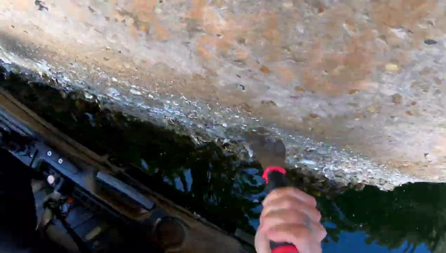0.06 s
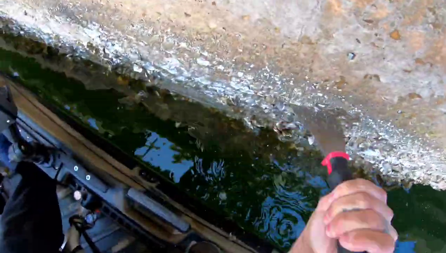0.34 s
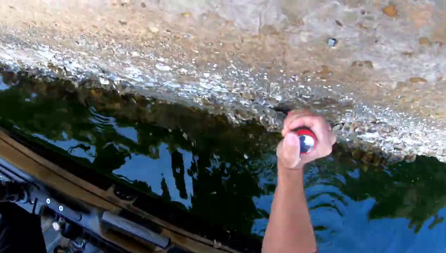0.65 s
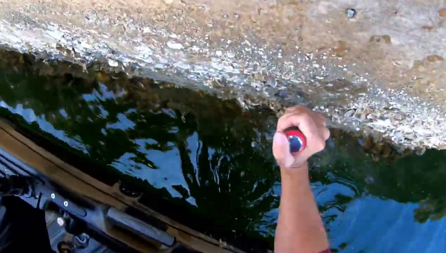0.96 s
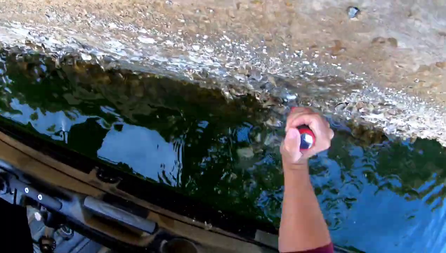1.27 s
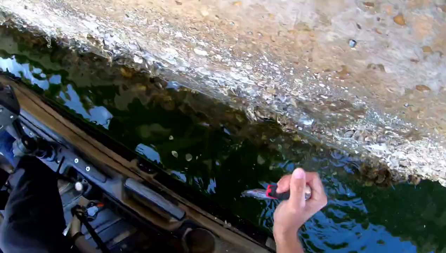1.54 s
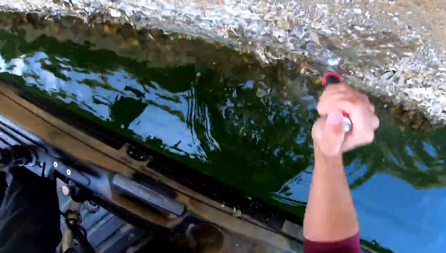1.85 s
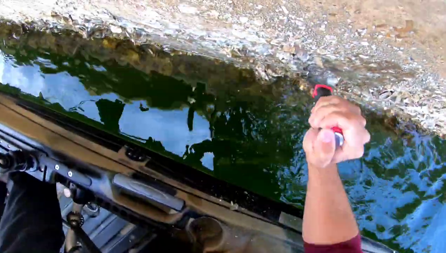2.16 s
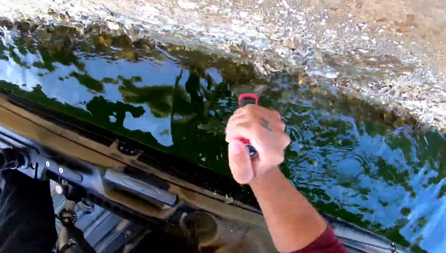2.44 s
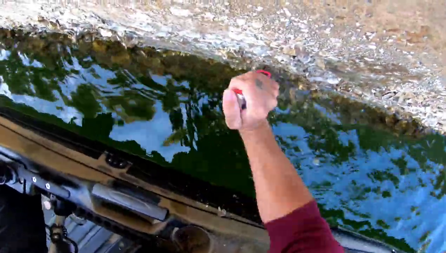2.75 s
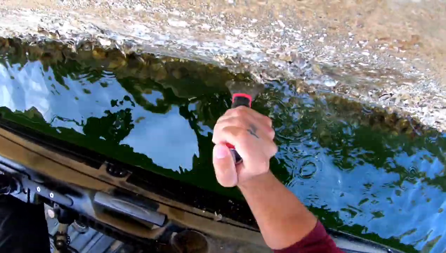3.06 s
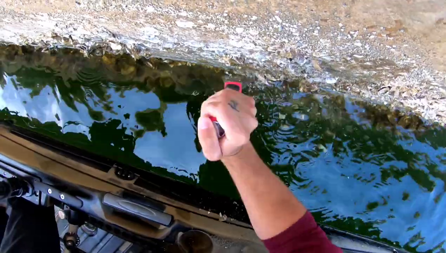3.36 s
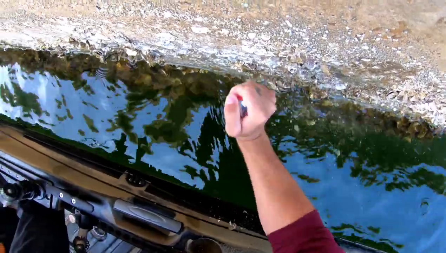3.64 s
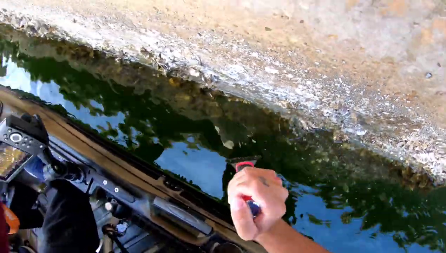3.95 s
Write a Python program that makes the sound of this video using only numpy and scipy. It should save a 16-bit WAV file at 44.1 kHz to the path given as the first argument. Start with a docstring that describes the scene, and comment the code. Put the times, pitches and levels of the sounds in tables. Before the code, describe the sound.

Short gritty scrapes of a steel blade on a shell-crusted wall, boat engines idling behind.

```python
"""Scraping shells off a harbour wall

From a boat idling beside a concrete wall, a stereo microphone close to a jabbing steel scraper.
The blade rasps lightly, bites into the crust with gritty screeches, cracks shells and rings;
bits plop into the water. Behind it two engines throb over the rumble of hull and wind,
and their wash swells as one of them speeds up."""
import sys
import numpy as np
from scipy import signal
from scipy.fft import rfft, irfft, next_fast_len
from scipy.io import wavfile
from scipy.ndimage import uniform_filter1d

SR = 44100
rng = np.random.default_rng(int(sys.argv[2]) if len(sys.argv) > 2 else 0)


def wrap_up_sound(samples):
    """Save the sound to the file named by the first command line argument, as 16-bit audio."""
    columns = np.atleast_2d(samples).T
    # keep every value between -1 and 1, then stretch to whole-number steps
    tamed = np.clip(columns, -1, 1)
    steps = np.round(tamed * 32767).astype(np.int16)
    wavfile.write(sys.argv[1], SR, steps)


N = 176400

# Levels are relative; scene() sets the balance.
# hull and wind around the microphone: frequency_hz, level_db
RUMBLE_SPECTRUM = [(15, -2), (28, -20), (38, 5), (60, 1), (85, -2.5), (125, -1), (160, -11.5), (230, -15.5),
                   (400, -28), (1000, -78)]
# rise and fall of that rumble: time_s, level_db
RUMBLE_LEVEL = [(0, -27), (.8, -27.5), (1.3, -23), (1.8, -21), (2.3, -26.5), (3.2, -25), (4, -26.5)]
# churned water around the boat: frequency_hz, level_db
WASH_SPECTRUM = [(60, -1), (200, -0.5), (320, 4.5), (480, 0), (700, 0), (1000, 1), (1400, -5.5),
                 (2000, -15), (3000, -26.5), (5000, -34.5), (7500, -37), (10000, -45), (13000, -63),
                 (16000, -64)]
# swell of that wash: time_s, level_db
WASH_LEVEL = [(0, -42.5), (.3, -43), (.68, -47), (1.1, -45), (1.4, -41.5), (1.8, -38), (2.3, -40),
              (3.0, -39), (3.4, -43), (3.7, -39.5), (4, -40.5)]
# how alike left and right are in rumble and wash: frequency_hz, correlation
STEREO_LIKENESS = [(30, 0.92), (250, .98), (400, 0.98), (600, 0.39), (1000, 0.13), (1600, 0.22),
                   (3000, 0.28), (8000, 0.27)]
# the engine that keeps idling: time_s, firing_hz, level_db
IDLING_ENGINE = [(0, 40.64, -23.5), (.3, 40.56, -25), (.55, 41.1, -24.5), (.75, 39.3, -30.5),
                 (1.05, 40.56, -22.5), (1.4, 39.47, -36.5), (1.8, 40.93, -19.5), (2.1, 39.55, -22),
                 (2.6, 39.51, -20), (3.3, 39.23, -29.5), (4, 39.59, -17.5)]
# the engine that speeds up: time_s, firing_hz, level_db
REVVING_ENGINE = [(0, 42, -40), (.8, 42, -30.5), (1.2, 45, -34), (1.42, 47.5, -21), (1.6, 44.5, -24.5),
                  (1.8, 45.3, -21), (2.15, 43.9, -20), (2.8, 44.6, -19), (3.4, 44.2, -18), (4, 44, -21)]
# harmonics 1 to 8 of each firing rate: level_db
IDLING_HARMONICS = [-8.5, 2.5, -7, -11.5, -27.5, -40.5, -32.5, -25.5]
REVVING_HARMONICS = [-17.5, -3, -3, -19, -34, -35, -27, -36]
# shell chips ringing as they break off: start_s, level_db, pitch_hz, decay_s
PLINKS = [(1.502, -38.5, 3530, .002), (2.606, -41, 6400, 0.0018), (2.949, -14.5, 2509, .003),
          (3.136, -35, 5000, 0.00092), (3.362, -21, 2770, 0.00069), (3.41, -43, 5100, 0.011)]
# knocks through the wall and bits landing in the water: start_s, level_db, pitch_hz, decay_s
THUDS = [(.19, -27, 1336, 0.003), (.322, -26.5, 564, 0.01), (0.33, -24.5, 300, 0.012),
         (0.755, -26.5, 1010, 0.0046), (0.781, -18, 277, 0.0078), (.782, -25.5, 515, 0.0025),
         (.903, -24, 448, 0.01), (1.177, -17, 278, 0.0063), (1.18, -29, 545, 0.0027),
         (1.582, -23, 272, 0.012), (1.897, -29, 930, 0.0025), (2.34, -26, 330.6, 0.0089),
         (2.87, -30.5, 887, 0.0088), (2.88, -23.5, 236, 0.0062), (3.316, -30, 1192, 0.0028),
         (3.704, -32, 709, 0.004)]
# light dragging between bites: start_s, length_s, level_db, sag_db
DRAGS = [(0.043, 0.059, -48, 10), (0.118, 0.042, -49.5, -6), (0.174, 0.044, -39, -3.5),
         (0.218, 0.33, -47.5, -6), (0.484, 0.068, -52, 2.5), (0.543, 0.22, -42.5, -10),
         (0.702, 0.017, -36.5, -1.5), (0.817, 0.11, -58.5, 5), (0.926, 0.084, -43.5, -14),
         (1.012, 0.073, -44, -2.5), (1.068, 0.036, -32.5, -8), (1.116, 0.038, -62, 17),
         (1.326, 0.037, -35.5, -12), (1.415, 0.055, -46, -4), (1.538, 0.023, -50, 13),
         (1.688, 0.033, -60, -4), (1.812, 0.025, -38, -10), (1.992, 0.032, -52, 9), (2.027, .19, -45, -9.5),
         (2.397, 0.068, -57, 8), (2.463, 0.071, -50, -20.5), (2.899, .04, -51, -2),
         (2.94, 0.038, -41.5, -1.5), (2.986, 0.2, -48, -18), (3.368, 0.067, -50, 1.5),
         (3.426, 0.13, -48.5, -17), (3.762, 0.086, -48, -15), (3.833, 0.17, -59, -4)]
# steel sliding on grit: frequency_hz, level_db
DRAG_SPECTRUM = [(300, 3), (1200, -6.5), (2200, 3.5), (4200, 1), (6000, -7.5), (7700, -4), (8700, -10.5),
                 (10000, -11.5), (11500, -26), (15000, -31)]
# extra resonances of the lightly held blade: pitch_hz, width_hz, lift_db
DRAG_MODES = [(2010, 91, 5), (4340, 39, 8.5), (7300, 100, 8)]
# the blade skipping free: start_s, length_s, low_mode_db, middle_mode_db, high_mode_db
RINGS = [(0.133, 0.033, -37, -59, -85), (0.483, 0.035, -42, -55, -85), (0.756, 0.022, -24, -21, -51),
         (1.148, 0.027, -21, -18, -29), (1.211, .016, -34, -14.5, -51), (1.225, 0.0093, -22, -38, -50),
         (2.867, 0.0079, -29, -28, -31.5), (2.883, 0.036, -30.5, -49, -91),
         (3.266, 0.059, -29.5, -28.5, -39), (3.6662, .021, -24, -26.5, -41.5),
         (3.689, 0.011, -22, -40, -51), (3.763, 0.089, -51, -60, -75)]
# low, middle and high mode of the free blade: pitch_hz
FREE_MODES = [4365, 7335, 9580]
# shells snapping under the edge: start_s, level_db, pitch_hz, lift_db
CRACKS = [(.099, -26, 4430, 9), (.190, -23, 3700, 10.5), (0.3083, -25, 5560, 4), (.722, -31, 2500, 12),
          (.756, -17, 2100, 16.5), (.782, -6.5, 3300, 13.5), (.902, -29, 6600, -4), (.932, -32, 6900, -4),
          (.965, -31.5, 8200, 26), (1.069, -31, 3000, 14), (1.098, -27.5, 3974, 7),
          (1.1795, -12.5, 2300, 8.5), (1.2067, -15, 2100, 8), (1.354, -21.5, 6620, 11),
          (1.557, -16, 5400, -26), (1.563, -16, 2000, 6), (1.585, -11.5, 4000, 10), (1.608, -17, 3900, 9),
          (1.626, -17, 1980, 7), (1.630, -18, 2300, 4), (1.816, -22.5, 5000, 2.5), (1.842, -36, 6000, 9),
          (1.8965, -8, 3200, 7), (1.900, -15.5, 2700, 21), (2.077, -29, 8000, 4), (2.313, -24.5, 4502, 1),
          (2.3435, -12.5, 2340, 4), (2.948, -30, 3800, 6), (3.197, -33.5, 5500, 3),
          (3.2715, -12.5, 3500, 6), (3.2865, -13, 5400, 15), (3.316, -8.5, 3300, 16),
          (3.362, -32.5, 2800, 14), (3.397, -39, 8000, 11), (3.6666, -20, 2300, 12.5),
          (3.704, -10, 3726, 8), (3.938, -37, 4500, -1)]
# bites into the crust: start_s, length_s, level_db, sag_db, first_mode_hz, second_mode_hz, treble_db
BITES = [(0.749, 0.0053, -27, 1, 1880, 3300, -3.5), (0.7544, 0.028, -16.5, -1.5, 2010, 3380, 0),
         (1.148, 0.035, -19.5, -3.5, 2070, 3707, 2), (1.2078, 0.005, -13, -2.5, 2140, 3640, -8.5),
         (1.214, 0.02, -29.5, 0.5, 2450, 4000, 0.5), (1.556, 0.0067, -8.5, -5, 2020, 3600, 2),
         (1.567, 0.019, -22.5, -2.5, 2320, 3680, -16), (1.606, 0.022, -14, -2, 2015, 3720, -3.5),
         (2.3238, 0.0092, -16, -3, 2320, 3410, -6), (2.338, 0.0094, -21, 0.5, 2370, 4370, -3),
         (2.8615, 0.023, -15.5, -2, 2820, 3330, -0.5), (3.2677, 0.017, -13, -22, 2400, 3450, -3.5),
         (3.284, .025, -13.5, -21, 2314, 3630, 0), (3.689, 0.0099, -25, -11.5, 4270, 6950, 7),
         (3.7002, 0.0058, -17, -3, 1972, 2060, -5.5)]
# steel edge on shell: frequency_hz, level_db
SHELL_SPECTRUM = [(150, -17.5), (400, -15), (800, -20.5), (1450, -11.5), (1900, 0), (2700, -1.5),
                  (4200, -2.5), (5800, -4), (7600, 0), (8500, -11.5), (9700, -9.5), (10700, -20.5),
                  (12300, -21), (13200, -25), (15500, -34.5)]
# resonances of the blade against the wall: pitch_hz, width_hz, lift_db
PRESSED_MODES = [(4430, 45, 7.5), (5220, 120, 5), (5480, 83, 7), (6040, 190, 6), (6760, 180, 6),
                 (7370, 270, 8), (7900, 80, 7.5), (9580, 220, 4), (11600, 230, 7), (12350, 200, 1)]
# phase between the microphone's two sides: frequency_hz, left_lead_rad
LEFT_LEAD = [(200, 0), (2000, .25), (4400, .6), (7000, 1), (8100, 1.35), (12000, 1.3)]
# balance between those sides: frequency_hz, left_minus_right_db
LEFT_BALANCE = [(500, -1), (2200, -0.5), (4000, -1.5), (6000, 0.5), (8000, 0), (12000, 2)]

BLADE_ATTACK_S, SNAP_RISE_S = .0011, .00028


def amp(db):
    return 10 ** (np.asarray(db) / 20)


def unit(x):
    return x / np.sqrt(np.mean(x ** 2) + 1e-20)


def at_hz(points, hz):
    knots_hz, value = np.transpose(points)
    return np.interp(np.log(hz + 1), np.log(knots_hz + 1), value)


def over_time(points, column=1):
    points = np.array(points)
    return np.interp(np.arange(N) / SR, points[:, 0], points[:, column])


def add(mix, start, sound):
    part = mix[max(round(start * SR), 0):][:len(sound)]
    part += sound[:len(part)]


def wander(size, hz):
    """Smooth random drift of unit spread, mostly slower than hz."""
    length = next_fast_len(size, real=True)
    lowpass = np.exp(-(np.fft.rfftfreq(length, 1 / SR) / hz) ** 2)
    return unit(irfft(rfft(rng.standard_normal(length)) * lowpass, length))[:size]


def colour(x, spectrum, modes, treble_db=0):
    """Causal filter: a broad spectrum with resonances, tilted by treble_db an octave above 4 kHz."""
    hz = np.fft.rfftfreq(4096, 1 / SR)
    lift = 1 + sum((amp(db) ** 2 - 1) / (1 + (2 * (hz - f) / width) ** 2) for f, width, db in modes)
    tilt_db = treble_db * np.clip(np.log2((hz + 1) / 4000), 0, 2)
    db = at_hz(spectrum, hz) + 10 * np.log10(np.maximum(lift, .1)) + tilt_db
    log_gain = np.log(amp(np.r_[db, db[-2:0:-1]]))
    impulse = np.fft.ifft(np.exp(np.conj(signal.hilbert(log_gain)))).real  # minimum phase
    return signal.fftconvolve(x, impulse)[:len(x)]


def stroke(t, length, sag_db, attack_s, release_s):
    """Quick rise, a hold that changes by sag_db, then release."""
    hold = amp(sag_db * np.minimum(t / length, 1))
    return np.minimum(t / attack_s, 1) * hold * np.exp(-np.maximum(t - length, 0) / release_s)


def burst(t, rise_s, decay_s):
    return stroke(t, rise_s, 0, rise_s, decay_s)


def match_energy(sound, envelope):
    return sound * np.linalg.norm(envelope) / (np.linalg.norm(sound) + 1e-12)


def churn(spectrum, patchy_db, frame):
    """Rumble or wash all around the boat: noise in drifting patches, partly shared by both sides."""
    hz, hop = np.fft.rfftfreq(frame, 1 / SR), frame // 4
    a, b, c, d, patches = rng.standard_normal((N // hop + 5, len(hz), 5)).T
    patches = unit(uniform_filter1d(uniform_filter1d(patches, size=6, axis=0), size=8, axis=1))
    likeness = at_hz(STEREO_LIKENESS, hz)[:, None]
    left = a + 1j * b
    right = likeness * left + np.sqrt(1 - likeness ** 2) * (c + 1j * d)
    spectra = np.array([left, right]) * amp(at_hz(spectrum, hz)[:, None] + patchy_db * patches)
    return unit(signal.istft(spectra, nperseg=frame, noverlap=frame - hop)[1][:, :N])


def engine(curve, harmonics_db, jitter=.004, flutter_db=.9):
    """Muffled firing pulses under the scene, slightly uneven in speed and strength."""
    firings = np.cumsum(over_time(curve) * (1 + jitter * wander(N, hz=6))) / SR
    tone = np.zeros(N)
    for harmonic, db in enumerate(harmonics_db, 1):
        strength = amp(db + flutter_db * wander(N, hz=6))
        tone += strength * np.cos(2 * np.pi * (harmonic * firings + rng.random()))
    return unit(tone) * amp(over_time(curve, column=2))


def arm_scatter(sound, above_hz=5000, spread_s=.004, level_db=-10):
    """The moving arm scatters each sound's treble differently to each side of the microphone."""
    noise = rng.standard_normal((2, int(spread_s * SR)))
    paths = signal.lfilter(*signal.butter(2, above_hz, "high", fs=SR), noise)
    scattered = signal.fftconvolve(sound[None], paths / np.linalg.norm(paths[0]), axes=1)
    return sound + amp(level_db) * scattered[:, :len(sound)]


def beside_wall(x, echo_db=-21.5, t60_s=.07, echoes_per_s=3000):
    """Close sounds reach the microphone's two sides differently; wall and hull add a brief echo."""
    hz, t = np.fft.rfftfreq(N, 1 / SR), np.arange(SR // 5) / SR
    left_gain = amp(at_hz(LEFT_BALANCE, hz) / 2) * np.exp(.5j * at_hz(LEFT_LEAD, hz))
    direct = irfft(rfft(x) * np.array([left_gain, 1 / left_gain]), N)
    taps = rng.standard_normal((2, len(t))) * (rng.random((2, len(t))) < echoes_per_s / SR)
    taps *= (t > .002) * amp(-60 * t / t60_s)
    echo = signal.fftconvolve(direct, taps / np.linalg.norm(taps[0]), axes=1)[:, :N]
    return direct + amp(echo_db) * echo


def plink(db, hz, decay_s):
    """A chip of shell flies off and rings briefly: a short high note that dies fast."""
    t = np.arange(SR // 10) / SR
    return amp(db) * burst(t, SNAP_RISE_S, decay_s) * np.sin(2 * np.pi * hz * t)


def thud(db, hz, decay_s, roughness=.6):
    """A knock on the wall or a plop beside it: a heavily damped low note with a puff of noise."""
    t = np.arange(SR // 8) / SR
    envelope = amp(db) * burst(t, rise_s=.002, decay_s=decay_s)
    band = signal.butter(2, [hz * .55, hz * 1.26], "band", fs=SR, output="sos")
    puff = match_energy(signal.sosfilt(band, rng.standard_normal(len(t)) * envelope), envelope)
    return match_energy(envelope * np.sin(2 * np.pi * hz * t) + roughness * puff, envelope)


def stick_slip(size, per_s, spread_db, chatter_db, chatter_hz):
    """The edge catches and lets go: tiny uneven clicks whose overall strength chatters."""
    clicks = (rng.random(size) < per_s / SR) * rng.choice([-1, 1], size)
    strength = amp(spread_db * np.minimum(rng.exponential(1, size), 4))
    return clicks * strength * amp(chatter_db * wander(size, chatter_hz))


def drag(length, db, sag_db):
    """The edge slides lightly over grit, which rasps through the blade's resonances."""
    t = np.arange(SR // 2) / SR
    envelope = amp(db) * stroke(t, length, sag_db, attack_s=.0046, release_s=.0046)
    force = stick_slip(len(t), per_s=5000, spread_db=3.4, chatter_db=2.5, chatter_hz=70) * envelope
    return match_energy(colour(force, DRAG_SPECTRUM, PRESSED_MODES + DRAG_MODES), envelope)


def ring(length, *modes_db, flutter_db=2, waver=.004):
    """The free blade sings unevenly in its modes until it touches the wall again."""
    t = np.arange(SR // 8) / SR
    tone = np.zeros(len(t))
    for hz, db in zip(FREE_MODES, modes_db):
        strength = amp(db + flutter_db * wander(len(t), hz=82))
        pitch_hz = hz * (1 + waver * wander(len(t), hz=120))
        tone += strength * np.sin(2 * np.pi * np.cumsum(pitch_hz) / SR)
    return tone * stroke(t, length, sag_db=-7, attack_s=BLADE_ATTACK_S, release_s=.0025)


def crack(db, hz, lift_db, width_hz=360):
    """A shell breaks in a noise burst of a few milliseconds."""
    t = np.arange(SR // 20) / SR
    envelope = amp(db) * burst(t, SNAP_RISE_S, decay_s=.0018)
    force = rng.standard_normal(len(t)) * envelope
    snap = colour(force, SHELL_SPECTRUM, [(hz, width_hz, lift_db)], treble_db=-4)
    return match_energy(snap, envelope)


def bite(length, db, sag_db, first_hz, second_hz, treble_db, width_hz=110, lift_db=11):
    """The edge chatters through the crust; dense slips make the bent blade screech."""
    t = np.arange(SR // 8) / SR
    envelope = amp(db) * stroke(t, length, sag_db, BLADE_ATTACK_S, release_s=.0037)
    force = stick_slip(len(t), per_s=3500, spread_db=2.8, chatter_db=3.6, chatter_hz=150) * envelope
    bend_modes = [(first_hz, width_hz, lift_db), (second_hz, width_hz * 1.9, lift_db)]
    screech = colour(force, SHELL_SPECTRUM, PRESSED_MODES + bend_modes, treble_db)
    return match_energy(screech, envelope)


def scene():
    """Scraper and debris close to the microphone, with engines, rumble and wash behind."""
    close = np.zeros((2, N))
    layers = [(bite, BITES, -2), (crack, CRACKS, -1), (ring, RINGS, 0),
              (drag, DRAGS, -.3), (thud, THUDS, -.5), (plink, PLINKS, -1.5)]
    for source, events, gain_db in layers:
        for start, *settings in events:
            stereo = arm_scatter(amp(gain_db) * source(*settings))
            for channel, sound in zip(close, stereo):
                add(channel, start, sound)
    engines = engine(IDLING_ENGINE, IDLING_HARMONICS) + engine(REVVING_ENGINE, REVVING_HARMONICS)
    rumble = churn(RUMBLE_SPECTRUM, patchy_db=1.26, frame=4096) * amp(over_time(RUMBLE_LEVEL))
    wash = churn(WASH_SPECTRUM, patchy_db=1.92, frame=1024) * amp(over_time(WASH_LEVEL) + 5.5)
    background = amp(-1.3) * engines + rumble + wash
    return beside_wall(close) + background * amp([[-.2], [.2]])  # background a touch to the right


def record(dry, ceiling=.85, cutoff_hz=15700):
    """The recorder rounds off the highest peaks, then cuts the top of the treble."""
    rounded = dry / (1 + (dry / ceiling) ** 6) ** (1 / 6)
    lowpass = signal.firwin(511, cutoff_hz, window=("kaiser", 9), fs=SR)
    return signal.oaconvolve(rounded, lowpass[None], "same")


dry = scene()
out = record(dry)
wrap_up_sound(out)
```